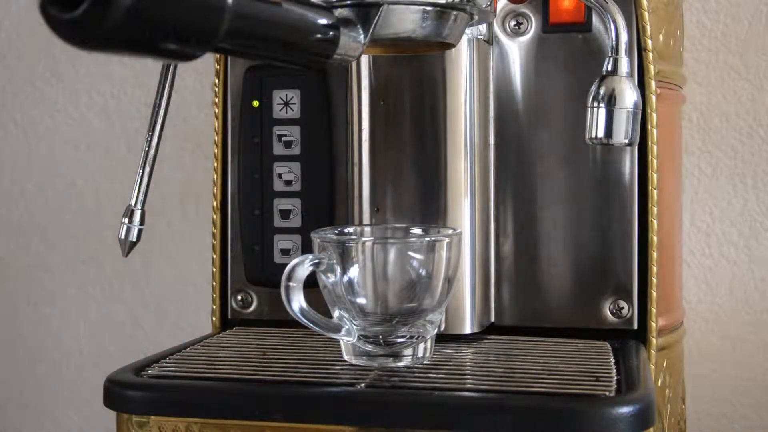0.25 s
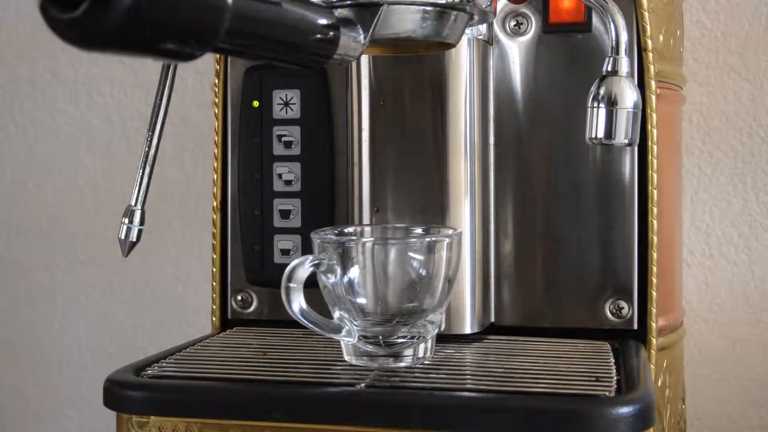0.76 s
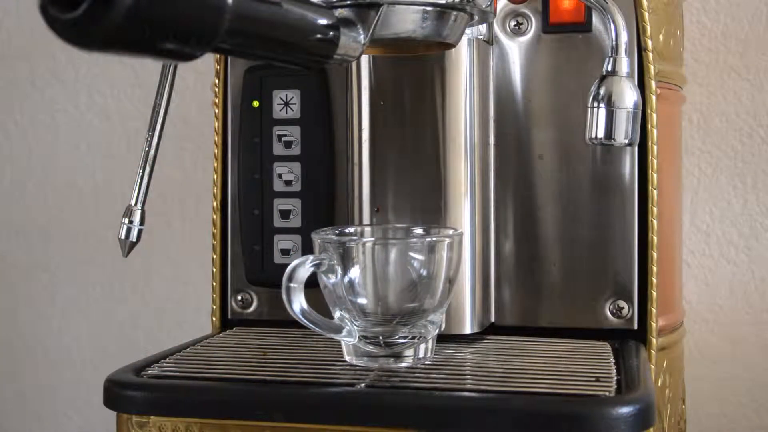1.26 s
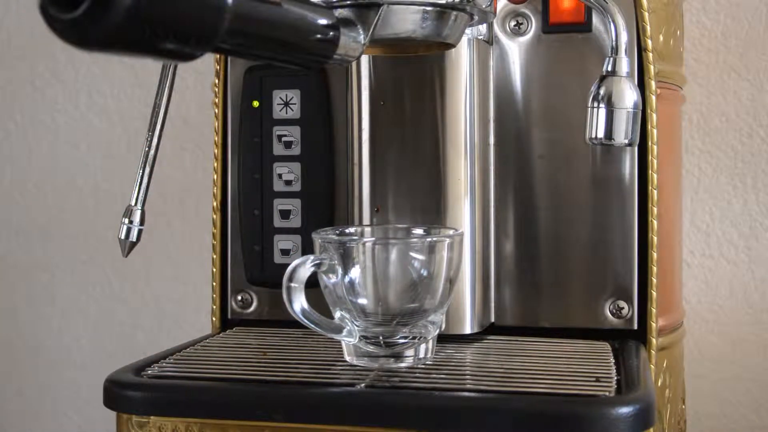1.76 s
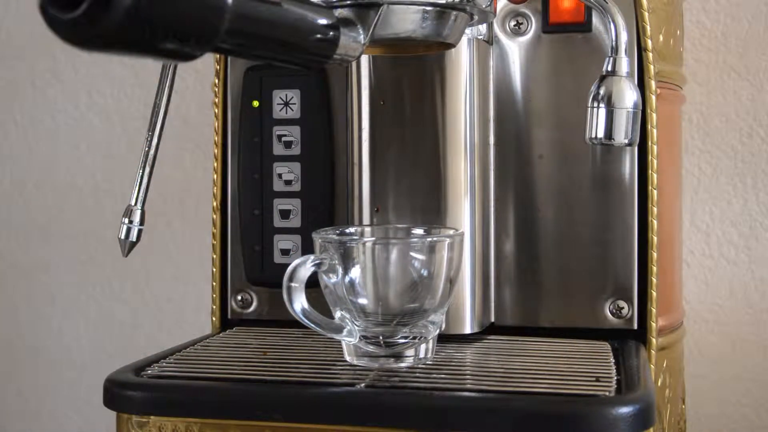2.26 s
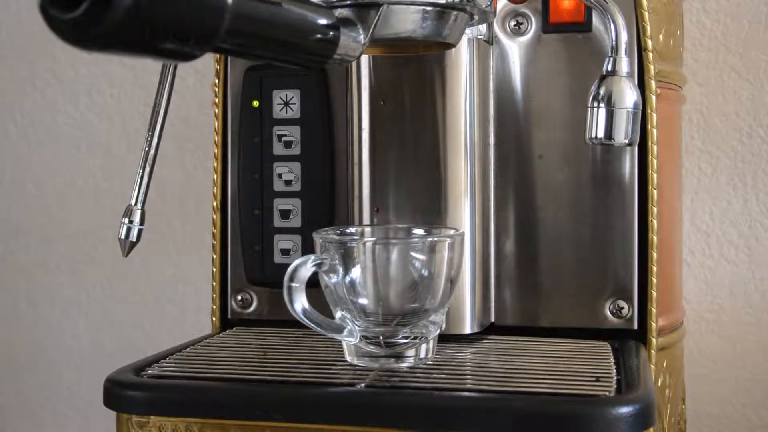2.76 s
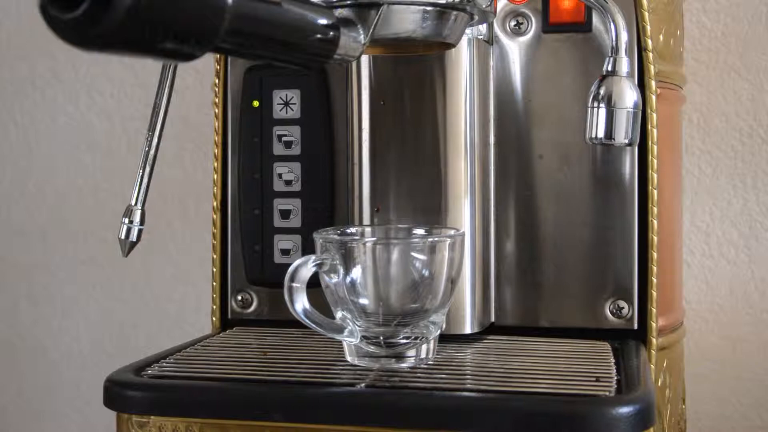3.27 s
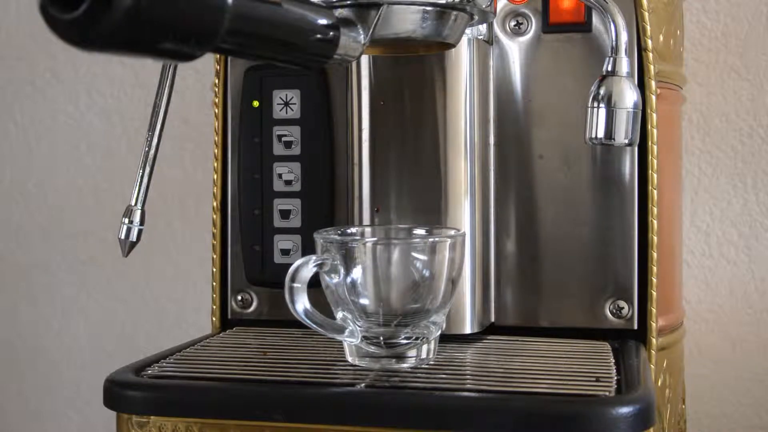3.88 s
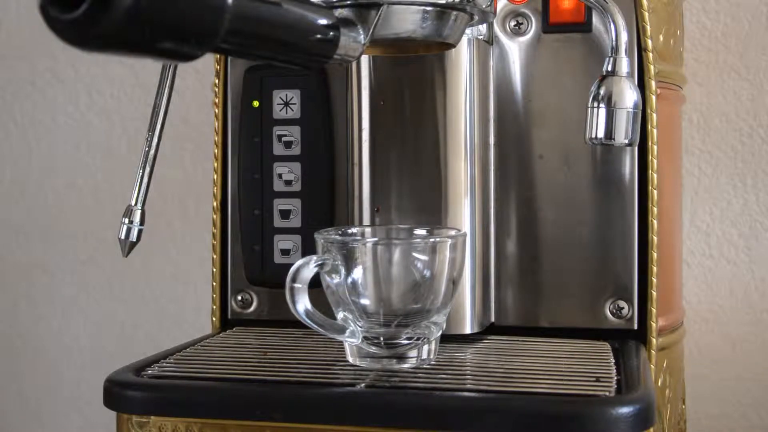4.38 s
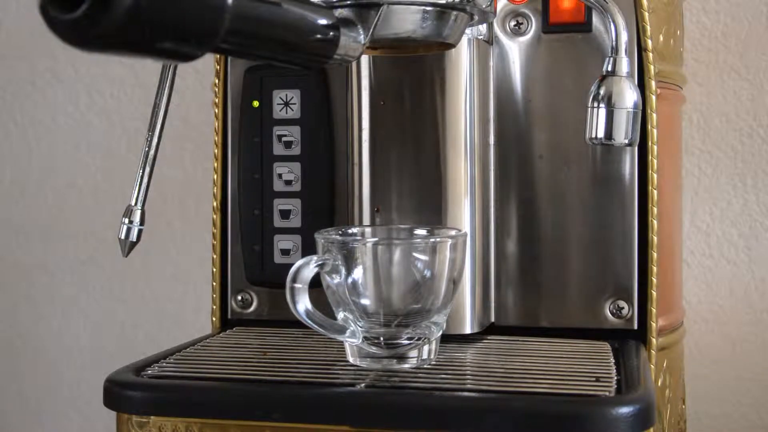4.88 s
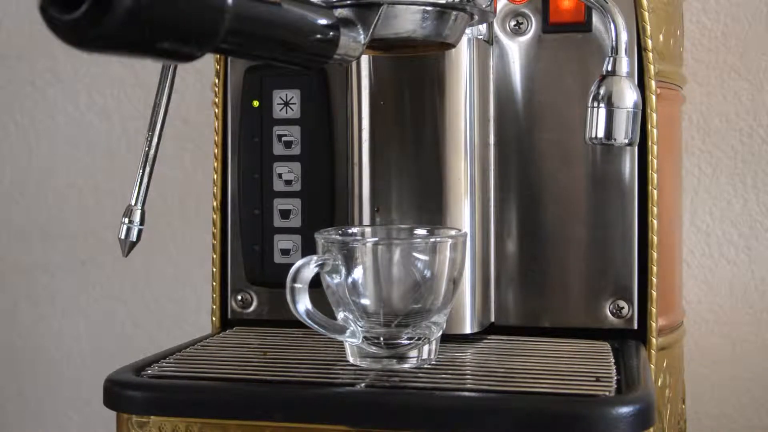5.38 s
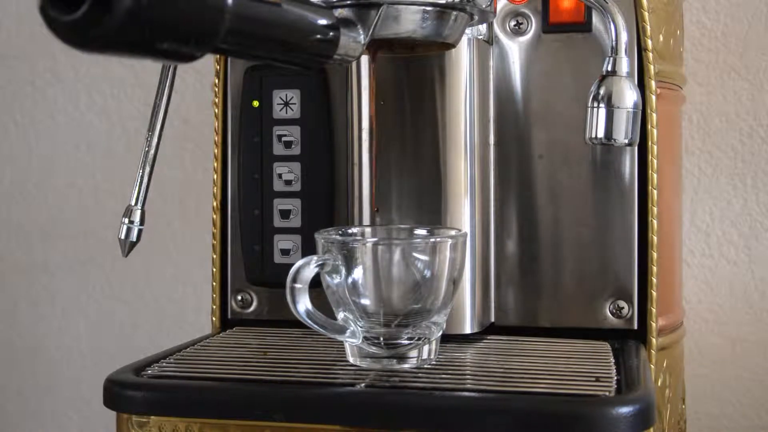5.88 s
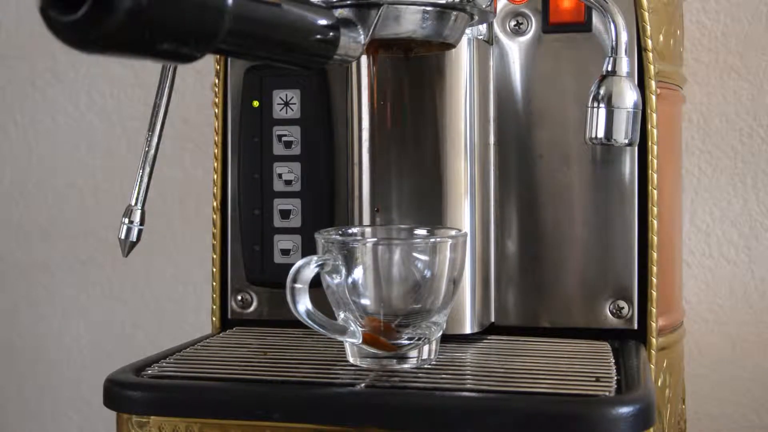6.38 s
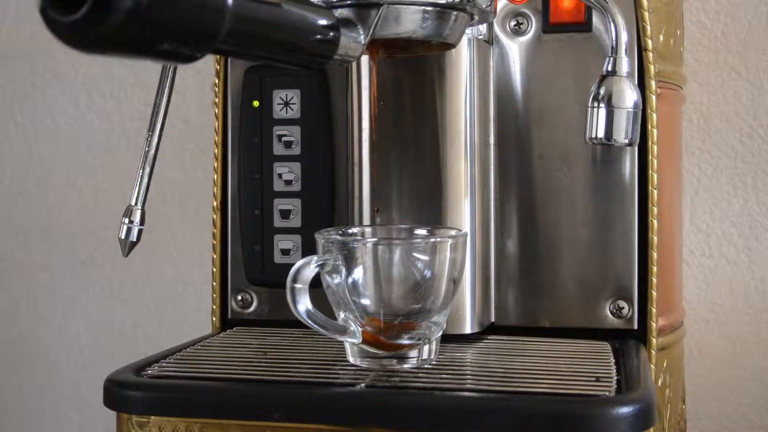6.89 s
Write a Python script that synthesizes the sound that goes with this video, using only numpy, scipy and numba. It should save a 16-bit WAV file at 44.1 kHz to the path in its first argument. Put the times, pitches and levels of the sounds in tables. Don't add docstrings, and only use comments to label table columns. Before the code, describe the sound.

A coffee machine pump drones steadily, already running, heard close with a soft room echo in stereo. Its buzzing metal case is covered by rushing water, fine valve ticking and a dense tray rattle that stutters in the first few seconds. The noise swells slightly, climbs to a thin whistling hiss and fades as pressure builds. The hum stays constant while hard clicking drips strike the glass near the end, then a light spatter.

```python
import sys
import numpy as np
from scipy import signal
from scipy.fft import rfft, irfft, next_fast_len
from scipy.io import wavfile
from scipy.ndimage import uniform_filter1d, map_coordinates
from numba import njit

SR = 44100
rng = np.random.default_rng(int(sys.argv[2]) if len(sys.argv) > 2 else 0)


def attenuation_scalar(level_db):
    decades = np.asarray(level_db, float) / 20
    return 10 ** decades


def int16_out(signal):
    q = np.round(np.clip(np.atleast_2d(signal).T, -1, 1) * 32767)
    wavfile.write(sys.argv[1], SR, q.astype(np.int16))


N = 314874

MAINS_HZ = 60.002
T = np.arange(N) / SR
STROKE = (T * MAINS_HZ) % 1

# multiple of the stroke rate, level/dB against the strongest line
PRIMING_LINES = [(1, -44), (2, -31), (3, -30), (4, -11), (5, -2), (6, 0), (7, -4), (8, -3), (9, -36),
                 (10, -14), (11, 2.5), (12, -8), (13, -6.5), (14, -1.5), (15, -15.5), (16, -6), (17, -13),
                 (18, -3.5), (19, -18), (20, -25), (21, -5), (22, -9.5), (23, -11), (24, -9), (25, -17),
                 (26, -30), (27, -26), (28, -39), (29, -6.5), (30, -15.5)]
FILLING_LINES = [(1, -57), (2, -50), (3, -36), (4, -10), (5, -5), (6, -7.5), (7, -6.5), (8, -9), (9, -16.5),
                 (10, -33.5), (11, -12.5), (12, -6.5), (13, 0), (14, -11), (15, -12.5), (16, -17),
                 (17, -11), (18, -27), (19, -37), (20, -20), (21, -6), (22, -11.5), (23, -18.5), (24, -14),
                 (25, -23), (26, -17.5), (27, -41), (28, -31), (29, -18), (30, -16)]
LOADING_LINES = [(1, -40), (2, -32), (3, -17), (4, -7.5), (5, -6.5), (6, -0.5), (7, -5), (8, -7),
                 (9, -14.5), (10, -17.5), (11, -8.5), (12, -4), (13, 1.5), (14, -13.5), (15, -12.5),
                 (16, -27), (17, -21), (18, -34), (19, -26), (20, -24), (21, -6.5), (22, -11), (23, -28),
                 (24, -10.5), (25, -18), (26, -17), (27, -16), (28, -25), (29, -15), (30, -21)]
SOAKING_LINES = [(1, -41), (2, -24.5), (3, -17.5), (4, -3), (5, -13.5), (6, -2), (7, -7), (8, -12),
                 (9, -5.5), (10, -16), (11, 1), (12, -2.5), (13, 0.5), (14, -5.5), (15, -6), (16, -9),
                 (17, -22), (18, -20), (19, -24), (20, -24), (21, -4), (22, -11), (23, -17), (24, -13),
                 (25, -19), (26, -18), (27, -16.5), (28, -12), (29, -10.5), (30, -18)]
PRESSING_LINES = [(1, -35.5), (2, -21.5), (3, -18.5), (4, -3.5), (5, -14.5), (6, -6.5), (7, -15),
                  (8, -21.5), (9, -14), (10, -16), (11, -13.5), (12, -5), (13, -2.5), (14, -7.5), (15, -11),
                  (16, -9.5), (17, -11.5), (18, -29), (19, -24), (20, -52), (21, -6.5), (22, -11.5),
                  (23, -18), (24, -20), (25, -17), (26, -33), (27, -19.5), (28, -14), (29, -13.5),
                  (30, -34)]
# multiple of the stroke rate, level/dB
UPPER_LINES = [(31, -32.5), (32, -23.5), (33, -20), (34, -17.5), (35, -12.5)]
# t/s, load (0 priming to 4 pressing)
PUMP_LOAD = [(0, 0), (.4, .15), (1.2, .9), (1.6, 1), (3.7, 1), (4.4, 2), (5.0, 2.1), (5.3, 3), (5.8, 3),
             (6.2, 4), (7.14, 4)]
# strongest hum line level/dB, water level/dB, valve and hiss level/dB
LOAD_LEVELS = [
    (-34.5, -35.5, -41),
    (-29.5, -37, -42.5),
    (-35, -38.5, -43),
    (-35.5, -43.5, -45),
    (-35.5, -46, -47.5),
]
# start t/s, length t/s, depth level/dB
FLOW_STALLS = [(0, 0.078, -4), (0.298, .11, -1.5), (0.662, 0.057, -13), (0.918, 0.059, -2.5),
               (0.986, 0.11, -7), (1.616, 0.12, -7), (1.962, 0.089, -8), (2.255, 0.03, -5),
               (2.883, 0.053, -20), (3.02, 0.098, -10), (3.16, 0.064, -4.5), (3.284, 0.39, -13)]
# f/Hz, width f/Hz, level/dB
VALVE_MODES = [(6326, 610, 9), (7390, 660, 2.5), (8300, 330, -4.5)]
# f/Hz, level/dB
HISS_TONE = [(4600, -3.5), (5200, -6.5), (6300, -7.5), (8700, -9), (9600, -22.5), (11000, -12),
             (16000, -40)]
# f/Hz, width f/Hz, level/dB
TRAY_MODES = [(2079, 47, 1.5), (2550, 32, 2), (2404, 41, -7), (2827, 47, -5.5), (3150, 15, -21),
              (3630, 120, -6), (3943, 5.8, -8), (4265, 10, -9), (4490, 22, -13.5)]
# running level/dB, swell level/dB, fade start t/s, fade slope/(dB/s), rest level/dB
TRAY_GROUPS = [
    (-25.5, -2, 4.41, -22, -46),
    (-35.5, 6.5, 4.64, -23, -48),
    (-35, 5, 4.9, -35.5, -50),
]
TRAY_STALL_SHARES = (1., 1, 0.64)
# t/s, f/Hz, width f/Hz, level/dB
AIR_POCKET = [
    (0, 2610, 906, -34),
    (4.3, 2730, 900, -35.5),
    (4.6, 3190, 910, -33.5),
    (4.9, 4080, 770, -38.5),
    (5.2, 4250, 352, -38),
    (5.45, 4170, 150, -44.5),
    (5.68, 4230, 119, -63),
    (5.82, 4230, 119, -45),
    (7.14, 4170, 120, -66),
]
# f/Hz, level/dB
WATER_TONE = [(30, -27), (100, -21), (200, -12.5), (300, -1.5), (500, 0), (800, 2.5), (1100, 1.5),
              (1700, 2.5), (2300, -0.5), (3200, -6), (4600, -6.5), (5500, -34)]
# t/s, extra level/dB, half length t/s
WATER_GUSHES = [
    (0, 2.5, 0.04),
    (5.367, 7.5, 0.14),
    (5.91, 7.5, 0.026),
]
# t/s, peak level/dB, ring f/Hz, width f/Hz, wash level/dB
GLASS_DROPS = [
    (5.8987, -8, 2930, 1500, -28),
    (5.9243, -17.5, 2540, 1010, -16.5),
    (5.9276, -16.5, 3370, 990, -16),
    (5.936, -24, 2760, 1000, -24),
    (6.0444, -19, 2530, 1000, -17),
    (6.2888, -10.5, 2900, 700, -25),
    (6.2922, -19, 2770, 1000, -30),
]
# t/s, peak level/dB, ring f/Hz, width f/Hz, wash level/dB
GLASS_SPLASHES = [
    (6.3129, -13.5, 2760, 260, -18),
    (6.3173, -18, 2720, 200, -24),
    (6.3284, -30, 2600, 200, -25),
    (6.3432, -18, 2730, 198, -21),
    (6.3478, -26, 2940, 200, -21),
    (6.373, -24, 2780, 200, -18),
    (6.3978, -27, 2780, 201, -17),
    (6.44, -31, 2680, 200, -11),
]
# f/Hz, level/dB
KITCHEN_TONE = [(20, -7.5), (50, -10), (90, -3), (250, -4.5), (1000, -37.5)]
# f/Hz, level/dB
ECHO_TONE = [(60, -19.5), (110, -15), (190, -18.5), (330, -35.5), (590, -18.5), (1040, -11), (1850, -11.5),
             (3270, -7.5), (5790, -4.5), (10200, -2.5)]
# f/Hz, level/dB
LEFT_TONE = [(60, 0.0), (110, 1.5), (190, -1), (330, -0.8), (590, 2), (1040, -3), (1850, -0.4),
             (3270, -0.5), (5790, -2.5), (10200, -1.5)]
# f/Hz, level/dB
TOP_LIMIT = [(20, 0), (9600, 0), (9750, -60), (20000, -60)]


def level(x, db=0):
    return x * attenuation_scalar(db) / np.sqrt(np.mean(x ** 2))


def curves(table):
    s, *columns = np.transpose(table)
    return [np.interp(T, s, c) for c in columns]


def colour(x, points):
    hz, db = np.transpose(points)
    size = next_fast_len(N)
    f = np.fft.rfftfreq(size, 1 / SR) + 1
    gain = attenuation_scalar(np.interp(np.log(f), np.log(hz), db))
    return irfft(rfft(x, size) * gain, size)[..., :N]


def ring(x, hz, width_hz):
    return signal.lfilter(*signal.iirpeak(hz, hz / max(width_hz, 10.), fs=SR), x)


def walk(rate, t=T):
    levels = rng.standard_normal(400)
    order = 1 + (len(t) < N)
    return 1.13 * map_coordinates(levels, [t * rate], order=order)


def grains(rate, scatter_db):
    hits = rng.random(N) < rate / SR
    return hits * rng.standard_normal(N) * attenuation_scalar(scatter_db * rng.standard_normal(N))


def load_levels():
    load = curves(PUMP_LOAD)[0]
    return [np.interp(load, np.arange(len(c)), c) for c in np.transpose(LOAD_LEVELS)]


def stall():
    sag_s, restart_s = 0.046, 0.0079
    dip_db = 0
    for s, long_s, db in FLOW_STALLS:
        sag = (T - s) / min(sag_s, long_s) + (s == 0)
        restart = (s + long_s - T) / restart_s + 1
        dip_db = dip_db + db * np.clip(np.minimum(sag, restart), 0, 1)
    return dip_db


def hum(wander_db=0.5, flutter_db=0.62, drift_rad=0.3):
    t = T[::64]
    load = curves(PUMP_LOAD)[0][::64]
    top_db = load_levels()[0][::64]
    pressure = np.clip((load - 2) / 2, 0, 1)
    loads = (PRIMING_LINES, FILLING_LINES, LOADING_LINES, SOAKING_LINES, PRESSING_LINES)
    stages = np.array([lines + UPPER_LINES for lines in loads])
    out = 0
    for k, dbs in zip(stages[0, :, 0], stages[:, :, 1].T):
        db = top_db + np.interp(load, np.arange(len(dbs)), dbs)
        db = db + wander_db * walk(1.535, t) + flutter_db * walk(12, t)
        free = .1 - 1.3 * (k % 2) * (k < 12) - .7 * (k > 11) - 2 * np.pi * k * .54
        free = free + (.5 + .03 * k) * rng.standard_normal()
        cushioned = -2 * np.pi * k * (.05 if k > 7 else .24) + .9 * (k < 8)
        cushioned = cushioned + (.4 + 1.4 * (k > 15 or 7 < k < 12)) * rng.standard_normal()
        shortest_turn = np.angle(np.exp(1j * (cushioned - free)))
        lag = free + pressure * shortest_turn + drift_rad * walk(2.473, t)
        wave = np.cos(2 * np.pi * k * STROKE + np.interp(T, t, lag))
        out = out - np.interp(T, t, attenuation_scalar(db)) * wave
    return np.sqrt(2) * out * attenuation_scalar(0.073 * stall())


def rattle_levels():
    swell_s = 0.71
    for (db, swell_db, s, slope_db, rest_db), share in zip(TRAY_GROUPS, TRAY_STALL_SHARES):
        swell = swell_db * np.clip(1 + (T - s) / swell_s, 0, 1)
        fade = slope_db * np.maximum(T - s, 0)
        yield np.maximum(db + swell + fade, rest_db) + share * stall()


def rattle(patchy_db=0.04, trim_db=-3.5, fade_db=-16.0):
    groups = [0, 0, 0]
    low_shake = 1 + .4 * np.cos(2 * np.pi * (STROKE - .8))
    high_shake = 1 + .2 * np.cos(2 * np.pi * (STROKE - .3))
    patches = attenuation_scalar(patchy_db * walk(25))
    for hz, width_hz, db in TRAY_MODES:
        g = int(hz > 3000) + int(hz > 3750)
        knocks = (high_shake if g else low_shake) * patches * grains(2500, 1.2)
        mode = ring(knocks, hz, (1.36 + 0.78 * g) * width_hz)
        mode = ring(mode, hz, 1400.0)
        groups[g] = groups[g] + level(mode, db + 10 * np.log10(width_hz)) * attenuation_scalar(1.5 * walk(40))
    fade = attenuation_scalar(fade_db * np.clip(T - 5.9, 0, 1))
    return fade * sum(level(x, trim_db) * attenuation_scalar(db) for x, db in zip(groups, rattle_levels()))


@njit
def glide(x, hz, width_hz):
    y, b, l = np.empty(len(x)), 0., 0.
    for i in range(len(x)):
        g, k = np.tan(np.pi * hz[i] / SR), width_hz[i] / hz[i]
        v = (b + g * (x[i] - l)) / (1 + g * (g + k))
        b, l, y[i] = 2 * v - b, l + 2 * g * v, k * v
    return y


def pocket():
    hz, width_hz, db = curves(AIR_POCKET)
    spray = grains(3000, 1.3) * attenuation_scalar(1.3 * walk(30))
    spray = glide(glide(spray, hz, width_hz), hz, width_hz)
    return level(spray / np.sqrt(width_hz)) * attenuation_scalar(db + 0.77 * stall())


def water(flow_db, depth=0.047):
    swell = 1 + depth * np.cos(2 * np.pi * (STROKE - .1))
    churn = rng.standard_normal(N) * swell * attenuation_scalar(1. * walk(15))
    return level(colour(churn, WATER_TONE), 4.86) * attenuation_scalar(flow_db)


def valve(hiss_db, scatter_db=3.2, tick_s=.0013, tail_s=.006):
    since = ((STROKE + .1) % 1) / MAINS_HZ
    strength = attenuation_scalar(scatter_db * rng.standard_normal(N // 500))
    size = strength[(T * MAINS_HZ + .1).astype(int)]
    shape = since / tick_s * np.exp(-since / tick_s) + .22 * np.exp(-since / tail_s)
    puff = size * shape * rng.standard_normal(N)
    tick = sum(attenuation_scalar(db) * ring(puff, hz, w) for hz, w, db in VALVE_MODES)
    hiss = colour(rng.standard_normal(N), [(3000, -36.5)] + HISS_TONE)
    hiss_fade = attenuation_scalar(-3. * np.clip(T - 5.4, 0, 1))
    return (level(tick, -2.5) + level(hiss, -0.24) * hiss_fade) * attenuation_scalar(hiss_db)


def knock(knock_db=-51, tilt_db=-3., scatter_db=4.):
    k = np.arange(36, 80)
    chance = rng.standard_normal((2, len(k)))
    turn = np.arange(2049) / 2048
    line_amp = attenuation_scalar(tilt_db * np.log2(k / k[0]) + scatter_db * chance[0])
    lines = np.cos(2 * np.pi * np.outer(k, turn - .28) + 2 * chance[1][:, None])
    cycle = line_amp @ lines
    return level(np.interp(STROKE, turn, cycle), knock_db) * attenuation_scalar(1. * walk(3))


def drops(table, wash_s, crack_db):
    out, cracks, t = np.zeros(N), np.zeros(N), T[:SR // 4]
    for s, db, hz, width_hz, wash_db in table:
        low = np.sin(2 * np.pi * hz * t) * np.exp(-np.pi * max(width_hz, 100.) * t)
        high = 0.18 * np.sin(2 * np.pi * 3950.0 * t) * np.exp(-t / 0.00042)
        smack = (low + high) * (1 - np.exp(-t / 0.00029))
        noise = rng.standard_normal(len(t))
        wash = ring(ring(noise, 2670.0, 1300.0), 2300.0, 1100.)
        wash = level(wash, wash_db) * np.exp(-t / wash_s)
        i = int((s + .0008) * SR)
        out[i:i + len(t)] += attenuation_scalar(db) * (smack / np.abs(smack).max() + wash)
        crack = attenuation_scalar(4 * db + crack_db) * noise * np.exp(-t / .0004)
        cracks[i:i + len(t)] += (db > -13.5) * crack
    return colour(out, TOP_LIMIT) + cracks


def kitchen_murmur():
    return level(colour(rng.standard_normal(N), KITCHEN_TONE), -61)


def kitchen_echo(mid):
    t60_s = .45
    t = T[:SR // 2]
    echo = rng.standard_normal(len(t)) * attenuation_scalar(-60 * t / t60_s)
    echo = echo / np.sqrt(np.sum(echo ** 2))
    side = signal.fftconvolve(mid, echo)[:N]
    return colour(colour(side, ECHO_TONE), TOP_LIMIT)


def scene():
    _, flow_db, hiss_db = load_levels()
    gush_db = sum(db * np.clip(1 - abs(T - s) / half_s, 0, 1) for s, db, half_s in WATER_GUSHES)
    machine = hum() + rattle() + pocket() + water(flow_db + gush_db)
    machine = machine + valve(hiss_db + .6 * gush_db) + knock()
    mid = colour(machine + kitchen_murmur(), TOP_LIMIT)
    mid = mid + drops(GLASS_DROPS, 0.061, -7.5) + drops(GLASS_SPLASHES, 0.073, -60.)
    side = kitchen_echo(mid)
    channels = []
    for way in (1, -1):
        tilt = [(hz, way * db / 2) for hz, db in LEFT_TONE]
        channels.append(colour(mid + way * side, tilt))
    return np.array(channels)


def roll_off(x):
    return signal.sosfilt(signal.butter(12, 15800, fs=SR, output="sos"), x)


def record(dry):
    slips = uniform_filter1d(1. * (walk(25) > 1.15), size=500) * attenuation_scalar(-1.5 * T)
    band = colour(rng.standard_normal((2, N)), [(10300, -90), (10400, 0), (10800, 0), (10900, -90)])
    offset = .0025
    return roll_off(dry + level(band, -58.) * slips + offset)


dry = scene()
out = record(dry)
int16_out(out)
```